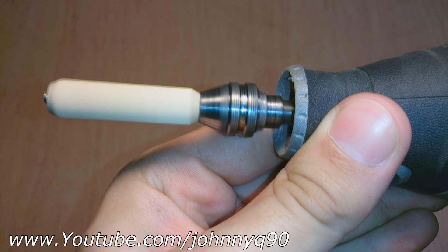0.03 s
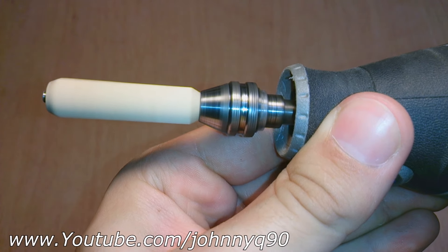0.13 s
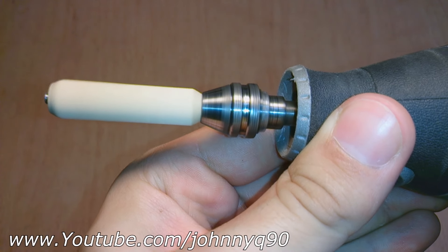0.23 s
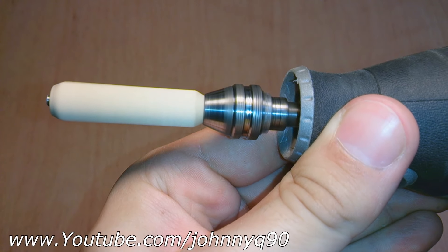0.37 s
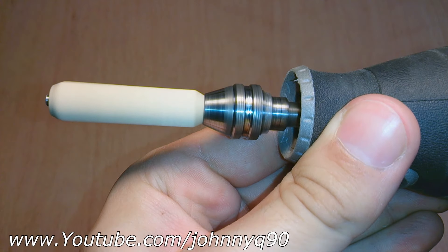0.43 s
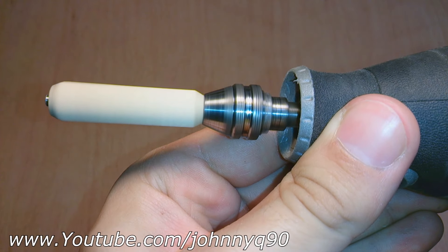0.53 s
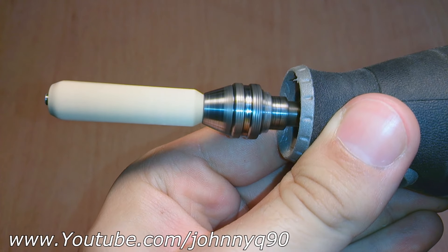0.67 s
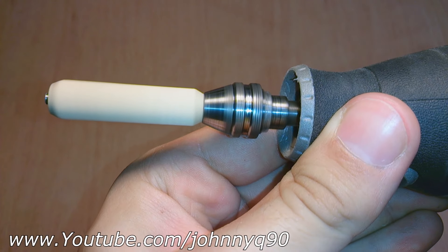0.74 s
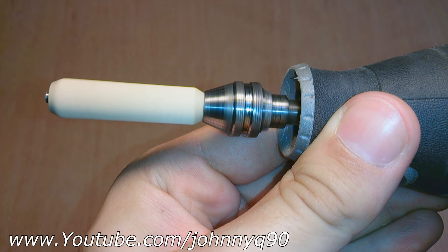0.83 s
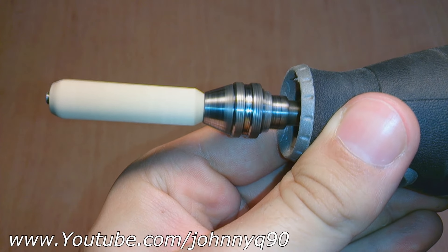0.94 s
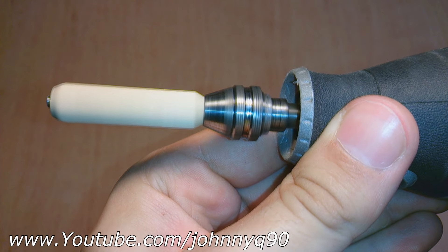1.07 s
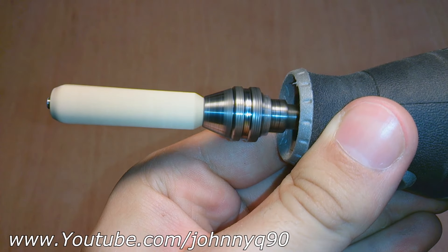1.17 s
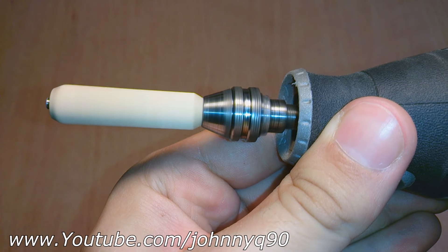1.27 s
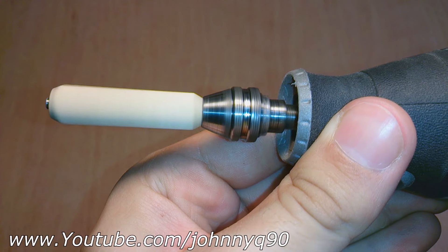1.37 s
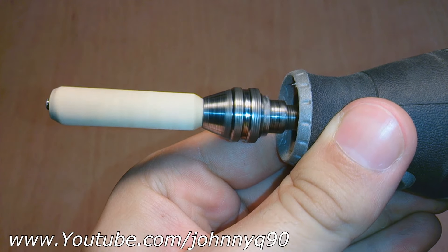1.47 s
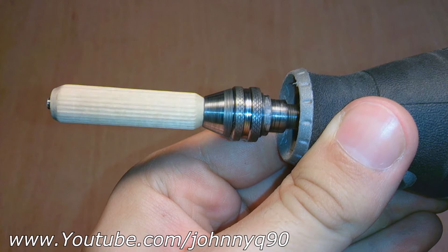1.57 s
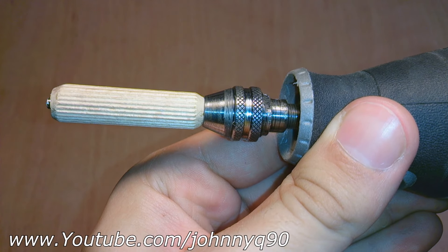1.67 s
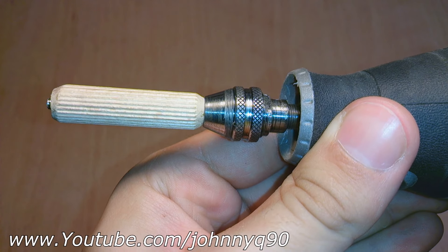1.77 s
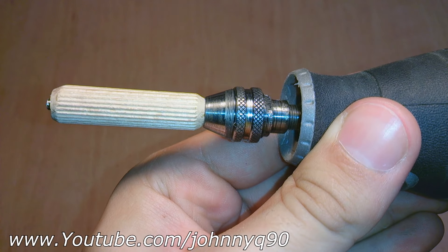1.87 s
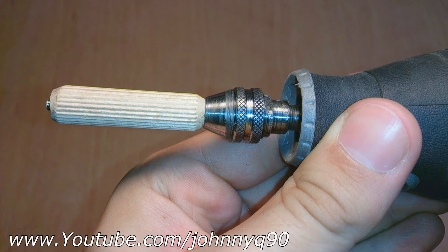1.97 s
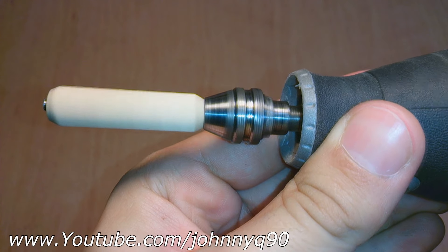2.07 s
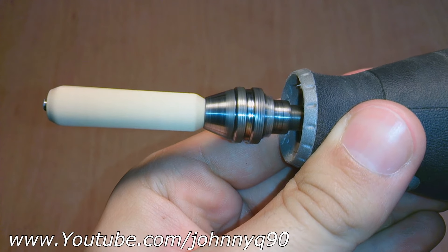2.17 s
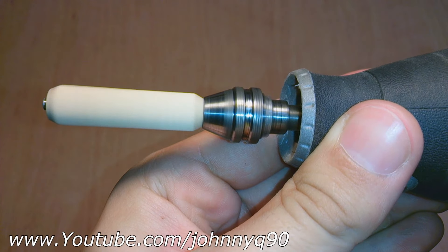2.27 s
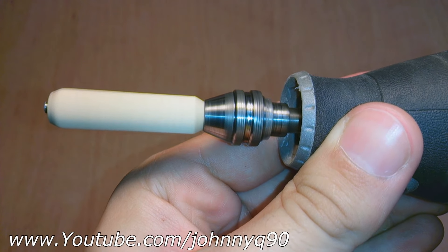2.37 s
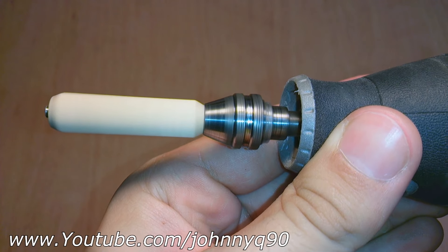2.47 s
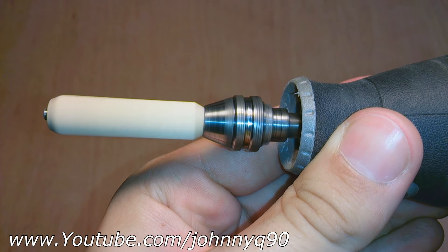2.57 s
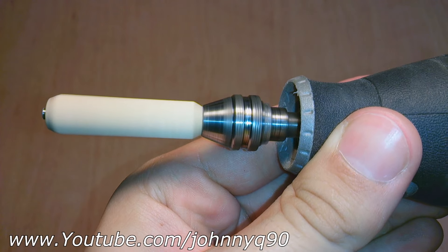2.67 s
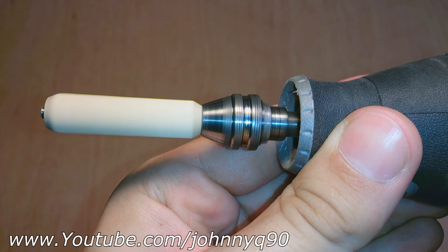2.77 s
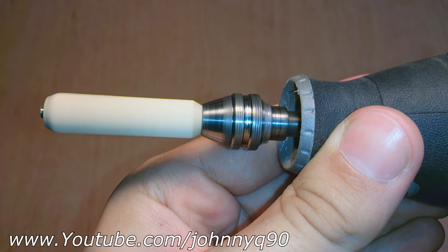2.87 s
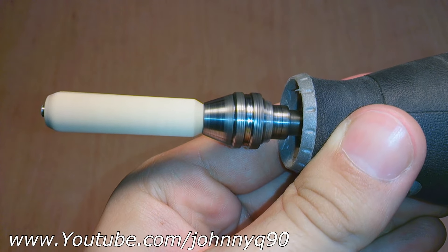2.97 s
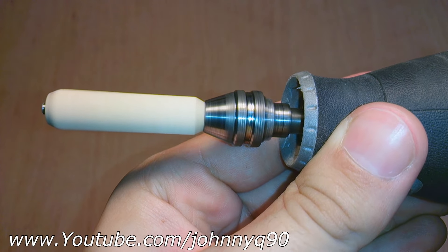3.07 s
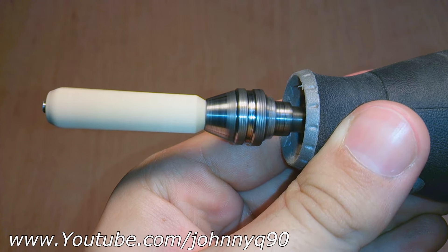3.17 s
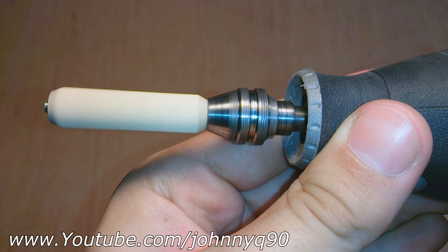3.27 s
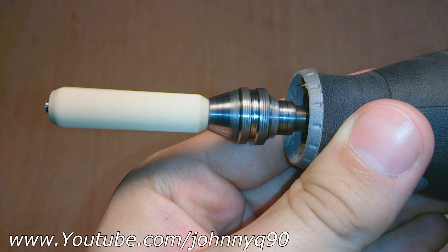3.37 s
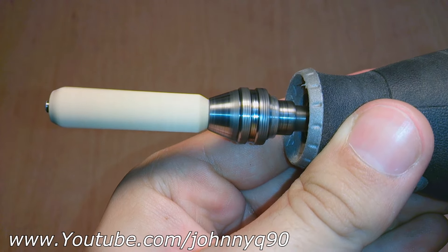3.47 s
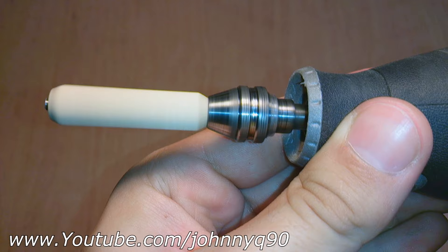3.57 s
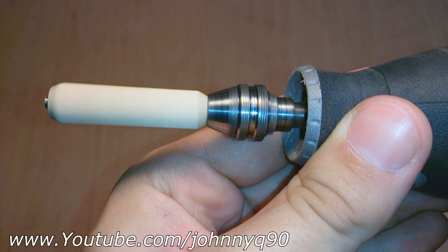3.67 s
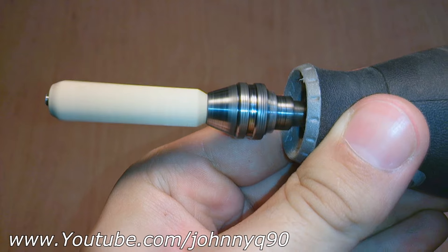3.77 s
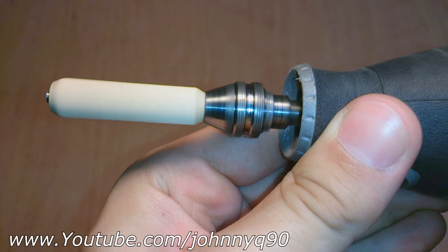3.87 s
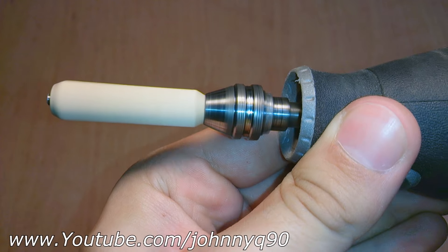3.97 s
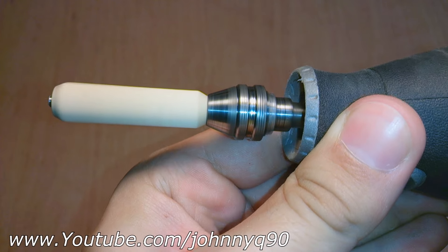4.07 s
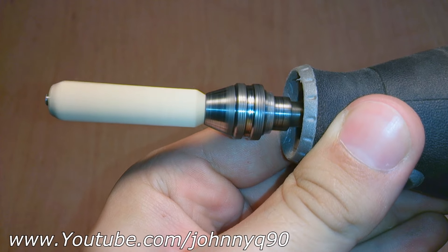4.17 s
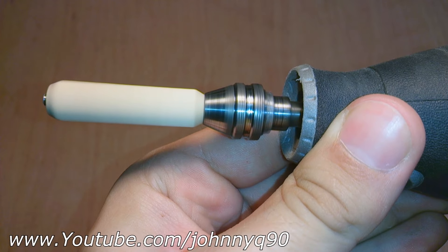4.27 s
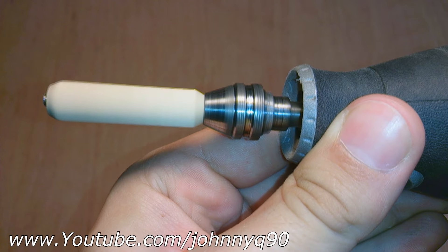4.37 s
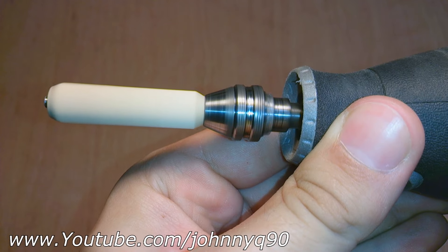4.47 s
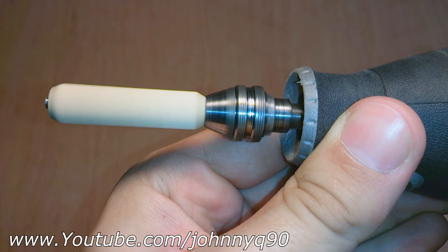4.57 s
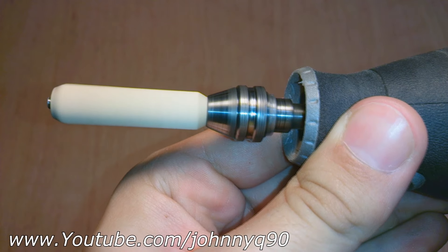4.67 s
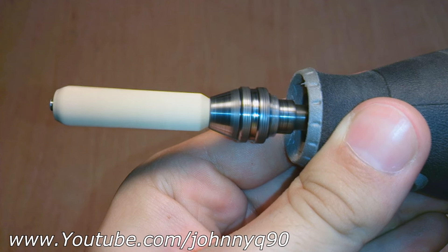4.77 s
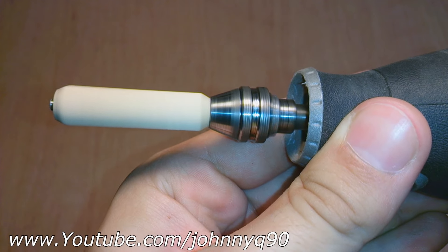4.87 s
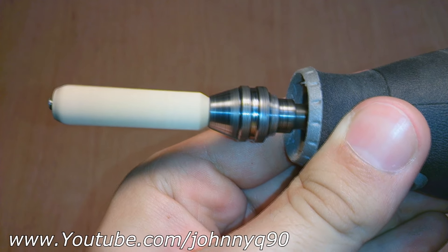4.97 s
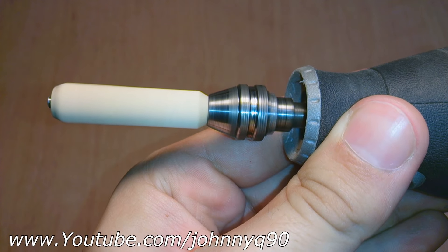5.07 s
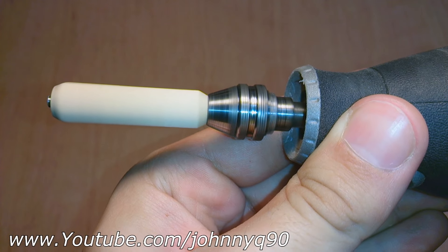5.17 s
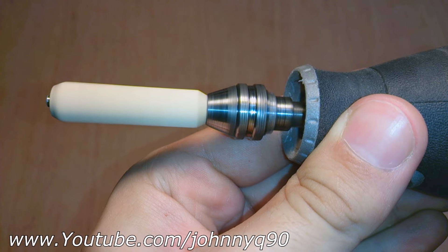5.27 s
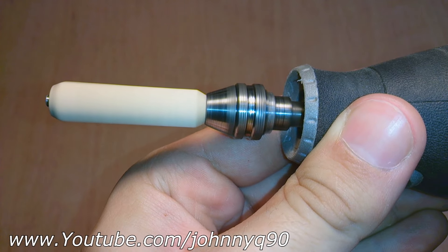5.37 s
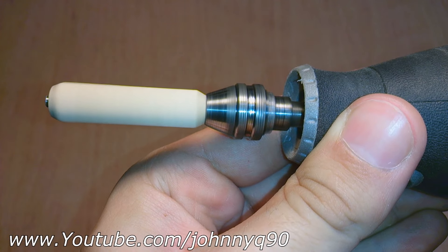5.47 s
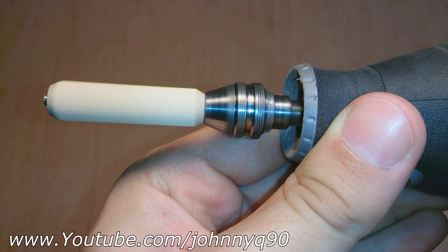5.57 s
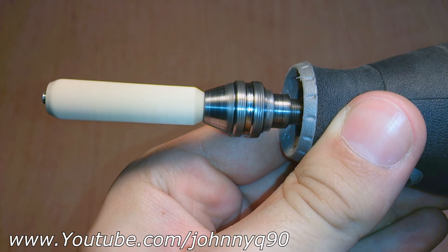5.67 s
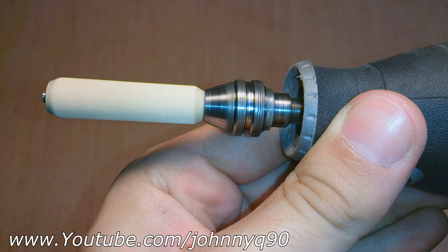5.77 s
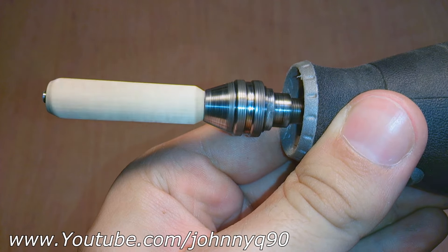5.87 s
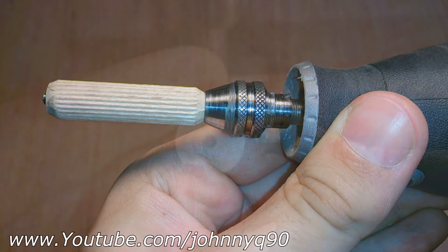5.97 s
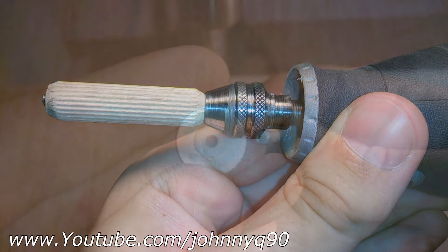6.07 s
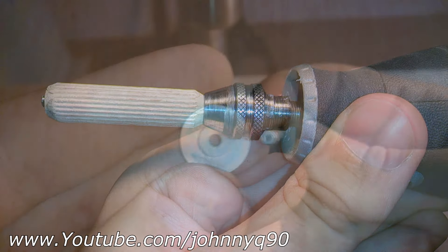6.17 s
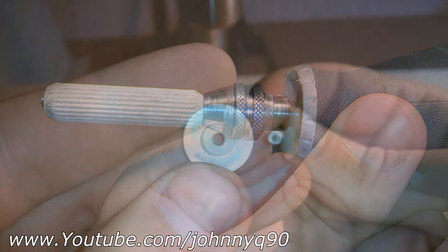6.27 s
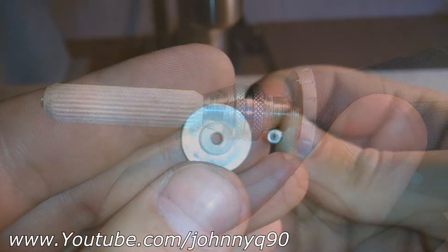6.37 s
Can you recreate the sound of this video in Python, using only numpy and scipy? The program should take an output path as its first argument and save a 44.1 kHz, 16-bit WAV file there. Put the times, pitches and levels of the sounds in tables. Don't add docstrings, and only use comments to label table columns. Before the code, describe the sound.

A handheld rotary tool, very close and almost entirely on the left, slides from a high whine down to a rattle and single brush ticks. After a short pause, a switch squeaks and snaps; the whistle surges up, steadies at a piercing pitch with hissing air and wind buffeting, then is switched off and coasts down through rattle and ticks, leaving faint finger taps in a quiet room.

```python
import sys
import numpy as np
from scipy import signal
from scipy.fft import rfft, irfft, next_fast_len
from scipy.io import wavfile
from scipy.ndimage import uniform_filter1d

SR = 44100
rng = np.random.default_rng(int(sys.argv[2]) if len(sys.argv) > 2 else 0)


def wrap_up_sound(samples):
    columns = np.atleast_2d(samples).T
    tamed = np.clip(columns, -1, 1)
    steps = np.round(tamed * 32767).astype(np.int16)
    wavfile.write(sys.argv[1], SR, steps)


def to_linear_factor(level_db):
    exponent = np.asarray(level_db, float) / 20
    return 10 ** exponent


N = 282681

BLADES, BARS, BALL_ORDER = 18, 8, 2.55
ON_S, OFF_S = 2.2504, 4.053
MAINS_HZ = 50.02
GAIN_DB = 6.0


def rms_one(x):
    return x / np.sqrt(np.mean(x ** 2) + 1e-20)


def response(hz, points, modes):
    at, db = np.transpose(points)
    gain = to_linear_factor(np.interp(np.log(hz), np.log(at), db))
    for mode_hz, width_hz, mode_db in modes:
        detuning = 2 * (hz - mode_hz) / width_hz
        gain = gain * (1 + (to_linear_factor(mode_db) - 1) / (1 + detuning ** 2))
    return gain


def colour(x, points, modes=()):
    size = next_fast_len(N + SR // 4)
    hz = np.maximum(np.fft.rfftfreq(size, 1 / SR), 1)
    inside = (hz >= points[0][0]) & (hz <= points[-1][0])
    return irfft(rfft(x, size) * response(hz, points, modes) * inside, size)[..., :N]


def drift(rate_hz):
    r = np.exp(-2 * np.pi * rate_hz / SR)
    slow = signal.lfilter([1], [1, -2 * r, r * r], rng.standard_normal(N + SR))[SR:]
    return rms_one(slow - slow.mean())


def noise_pair():
    left, own = rng.standard_normal((2, N))
    share = 0.15
    return np.array([left, share * left + np.sqrt(1 - share ** 2) * own])


def blade_rate(t):
    # start_s, blade_rate_hz, friction_hz, drag_time_s
    coasts = [
        (0, 7232, 9124, 3.112),
        (4.053, 8425, 8485, 3.012),
    ]
    first, second = [(hz + friction) * np.exp(-(t - s) / drag) - friction for s, hz, friction, drag in coasts]
    on = np.maximum(t - ON_S, 0)
    top_hz, quick_share, quick_s, slow_s = 8470, 0.4705, 0.1106, 0.3914
    shortfall = quick_share * np.exp(-on / quick_s) + (1 - quick_share) * np.exp(-on / slow_s)
    powered = top_hz * (1 - shortfall)
    return np.maximum(np.where(t < ON_S, first, np.where(t < OFF_S, powered, second)), 1)


def by_speed(blade_hz, db, db_per_oct, fade_hz, steepness=2):
    return to_linear_factor(db + db_per_oct * np.log2(blade_hz / 5000)) / (1 + (fade_hz / blade_hz) ** steepness)


def order(turns, shaft_hz, multiple, wander_db):
    audible = np.clip((17000 - multiple * shaft_hz) / 1000, 0, 1)
    return np.sqrt(2) * audible * to_linear_factor(wander_db) * np.sin(2 * np.pi * (multiple * turns + rng.random()))


def brushes(turns, shaft_hz, first, count):
    return sum(order(turns, shaft_hz, BARS * k, 2.2 * drift(12)) for k in range(first, first + count))


def mains_buzz(t):
    # band_hz, width_hz, level_db
    bands = [(11170, 490, -93.5), (12750, 620, -101), (14800, 900, -99)]
    hz = MAINS_HZ * np.arange(200, 310)
    gain = sum(to_linear_factor(db) / (1 + (2 * (hz - at_hz) / width_hz) ** 4) for at_hz, width_hz, db in bands)
    gain = gain * to_linear_factor(5.5 * rng.standard_normal(len(hz)))
    phases = rng.random(len(hz))
    return sum(np.sqrt(2) * g * np.sin(2 * np.pi * (f * t + p)) for f, g, p in zip(hz, gain, phases))


def background():
    # frequency_hz, density_db
    floor = [(12, -23.5), (20, 3), (32, -0.5), (53, -10.5), (80, -14), (130, -2.5), (175, -24.5),
             (353, -23), (911, -31), (1700, -34), (2600, -33), (8010, -35.5), (10300, -24), (12000, -29),
             (15700, -34)]
    t = np.arange(N) / SR
    noise = colour(rng.standard_normal((2, N)), floor)
    noise /= np.std(noise)
    rumble = signal.sosfilt(signal.butter(2, 400, fs=SR, output="sos"), noise)
    busier = np.clip((t - 5.6) / 0.48, 0, 1)
    room = to_linear_factor(8.0 * busier) * rumble + to_linear_factor(3.5 * busier) * (noise - rumble)
    left = to_linear_factor(GAIN_DB) * (to_linear_factor(-73.5) * room[0] + mains_buzz(t))
    return np.array([left, to_linear_factor(-80) * room[1]])


def squeak(s, length_s, hz, width_hz):
    band = signal.butter(2, [hz - width_hz / 2, hz + width_hz / 2], "band", fs=SR, output="sos")
    swell = np.exp(-(2 * (np.arange(N) / SR - s) / length_s) ** 4)
    return swell, rms_one(signal.sosfilt(band, rng.standard_normal(N)))


def rubs():
    # centre_s, length_s, pitch_hz, width_hz, level_db
    slips = [
        (2.132, .03, 4220, 2980, -78),
        (2.252, 0.03, 5184, 5350, -50),
        (2.277, 0.043, 330, 120, -71),
        (4.379, 0.014, 450, 518, -22.5),
        (6.149, 0.0039, 2600, 3590, -66.5),
        (6.376, 0.036, 1700, 1626, -72.5),
    ]
    total = np.zeros(N)
    for *slip, db in slips:
        swell, rough = squeak(*slip)
        total += to_linear_factor(db) * swell * rough
    return total


def ticks(rows, hz, t60_s):
    out, t = np.zeros(N + 4000), np.arange(4000) / SR
    band = signal.butter(3, [hz * 0.87, min(hz * 1.13, .45 * SR)], "band", fs=SR, output="sos")
    envelope = to_linear_factor(-60 * t / t60_s) * (1 - np.exp(-t / 0.0006))
    for (s, db), noise in zip(rows, rng.standard_normal((len(rows), 4000))):
        burst = signal.sosfilt(band, noise * envelope)
        at = round(s * SR)
        out[at:at + 4000] += to_linear_factor(db) * burst / np.abs(burst).max()
    return out[:N]


def contacts():
    # start_s, peak_db
    brush_ticks = [(1.616, -52), (1.6534, -48), (1.7035, -46), (1.7475, -44.5), (1.7818, -48.5),
                   (2.1394, -66), (2.234, -49), (2.2403, -38), (2.245, -32.5), (2.2557, -26.5),
                   (2.2612, -48), (5.9624, -53), (5.9675, -43), (5.973, -47), (6.004, -45), (6.0115, -47),
                   (6.0204, -47), (6.0284, -47), (6.0628, -54)]
    # start_s, peak_db
    taps = [
        (6.1474, -61),
        (6.3735, -54),
        (6.3794, -56),
    ]
    return ticks(brush_ticks, hz=10700, t60_s=0.015) + ticks(taps, hz=4100, t60_s=0.0078)


def draught(shaft_hz):
    # frequency_hz, density_db
    spectrum = [(12, -50), (20, 0.5), (54, -0.5), (199, 3.5), (394, -9), (565, -19), (637, -22),
                (1050, -32.5), (1200, -48), (1560, -47), (2640, -120)]
    air = rms_one(colour(rng.standard_normal(N), spectrum))
    roll = signal.sosfilt(signal.butter(4, 95, fs=SR, output="sos"), air)
    above = signal.sosfilt(signal.butter(4, 95, "high", fs=SR, output="sos"), air)
    calm = np.clip(1 - shaft_hz / 330, 0, 1)
    puffs_db = (1 + 6 * calm) * drift(15)
    lumps = to_linear_factor(puffs_db + 4.5 * drift(92) - 63 * calm ** 2.41)
    crests = signal.sosfilt(signal.butter(2, 450, "high", fs=SR, output="sos"), air) * (shaft_hz / 470) ** 2
    roll = roll * to_linear_factor(0.5 * puffs_db)
    return roll + (above + to_linear_factor(12.5) * crests) * lumps * to_linear_factor(-7.5)


def casing(turns, shaft_hz):
    # frequency_hz, density_db
    broad = [(290, -13), (500, -13.5), (752, -14), (1160, -2.5), (1670, -7.5), (3160, -4), (3610, -8),
             (5200, -6.5), (7000, -10), (9100, -52), (15400, -120)]
    # mode_hz, width_hz, gain_db
    modes = [(1260, 310, 1), (1824, 230, 5.5), (3443, 210, 10.5), (4378, 300, 20), (5150, 200, -19),
             (5900, 400, 8.5)]
    # mode_hz, width_hz, gain_db
    housing = [(5000, 900, 8)]
    # ball_rate_multiple, level_db
    ball_tones = [(1, -24), (3, -17), (3.85, -27), (4.4, -25), (5, -16)]
    grit = noise_pair() * to_linear_factor(1.0 * drift(36) + 2.0 * drift(300))
    slow = np.clip(1 - shaft_hz / 480, 0, 1) ** 0.49
    balls = sum(to_linear_factor(db + 1.8 * drift(20)) * order(turns, shaft_hz, BALL_ORDER * k, 0) for k, db in ball_tones)
    bars = to_linear_factor(-31 + 11 * slow) * brushes(turns, shaft_hz, first=2, count=4)

    acceleration = uniform_filter1d(np.gradient(shaft_hz) * SR, size=3000)
    load = np.clip(acceleration / 1300, 0, 1) * np.clip((shaft_hz - 170) / 90, 0, 1)
    mains = 1 + 0.9 * np.sin(2 * np.pi * 100 * np.arange(N) / SR)
    pull = to_linear_factor(-6.5) * order(turns, shaft_hz, BARS, 0)
    pull += to_linear_factor(-7.0) * order(turns, shaft_hz, 2 * BARS, 0)
    pull += to_linear_factor(-9) * order(turns, shaft_hz, 6 * BALL_ORDER, 0)
    pull *= load * mains * to_linear_factor(2.6 * drift(40))

    tones = colour(to_linear_factor(-14 * slow ** 2 + 7.1 * load) * balls + bars, broad, modes)
    tones += colour(pull, broad, housing)
    plain = colour(grit, broad)
    noise = (1 - slow) * plain + slow * to_linear_factor(-9.5) * colour(grit, broad, modes)
    return (noise + to_linear_factor(-4) * tones) / np.std(plain[0])


def fan_hiss(turns, shaft_hz):
    # frequency_hz, density_db
    spectrum = [(2940, -21.5), (5000, -17.5), (6380, -15), (6850, -10.5), (9160, -5.5), (9470, -3.5),
                (10000, -0.5), (10900, -3.5), (12200, -11), (13200, -13), (15600, -14.5)]
    # mode_hz, width_hz, gain_db
    vents = [(6900, 800, 8), (8300, 600, 5), (10400, 1000, 5), (12700, 900, 8)]
    air = colour(noise_pair() * to_linear_factor(0.32 * drift(4.8) + 1.2 * drift(330)), spectrum)
    slow = np.clip(1 - shaft_hz / 470, 0, 1)
    uneven = sum(order(turns, shaft_hz, BARS * k + 4, 0) + order(turns, shaft_hz, BARS * k + 6, 0)
                 for k in range(4, 16))
    comb = brushes(turns, shaft_hz, first=2, count=14) + to_linear_factor(-6) * uneven
    comb = to_linear_factor(-31 + 26 * slow * (1.3 - slow)) * comb
    return (air + colour(comb, spectrum, vents)) / np.std(air[0])


def blade_tone(turns, shaft_hz):
    # shaft_multiple, level_db
    shaft_tones = [(15, -45), (23, -29.5), (36, -20)]
    others = sum(to_linear_factor(db) * order(turns, shaft_hz, k, 2.1 * drift(10)) for k, db in shaft_tones)
    waver_db = 5 * np.clip(1 - shaft_hz / 470, 0, 0.5) * drift(22)
    return order(turns, shaft_hz, BLADES, 0.53 * drift(60) + waver_db) + others


def jolted(tone):
    # centre_s, length_s, pitch_hz, width_hz, level_db (re whistle)
    jolts = [
        (0.125, 0.035, 6550, 500, 3),
        (4.061, 0.026, 8700, 550, 0),
    ]
    for *row, db in jolts:
        swell, rough = squeak(*row)
        tone = (1 - 0.6 * swell) * tone + to_linear_factor(db) * swell * rough
    return tone


def fan_whistle(t, turns, blade_hz, rattle):
    # frequency_hz, level_db
    strength = [(600, -127), (1000, -87), (1800, -77.5), (2500, -58.5), (4500, -41), (7000, -24.5),
                (7800, -14.5), (8500, -5)]
    # mode_hz, width_hz, gain_db
    path = [(1170, 250, 6), (3350, 300, 4), (5920, 260, -15), (6280, 200, -11), (6850, 250, 4),
            (7150, 200, -5)]
    unpowered = (t < ON_S) | (t > OFF_S)
    carried = to_linear_factor(-12) * rattle / (1 + ((blade_hz - 1150) / 380) ** 4) * unpowered
    gain = np.maximum(response(blade_hz, strength, path), carried) * (blade_hz > 300)
    whistle = gain * jolted(blade_tone(turns, blade_hz / BLADES))
    strain = np.clip(np.gradient(blade_hz) * SR / 25000, 0, 1)
    return whistle * to_linear_factor(-7 * strain) * (1 + strain * np.sin(4 * np.pi * MAINS_HZ * t))


def scene():
    # time_s, level_db
    aim = [(0, 3), (1.0, -3), (1.42, 4), (2.4, -6), (3.0, -2), (3.9, 0), (4.3, 4), (4.8, -3.5), (5.5, -6.5)]
    # frequency_hz, level_db
    shield = [(60, 58), (200, 56.5), (380, 21.5), (700, 12.5), (1290, 16), (2380, 23), (4400, 34.5),
              (7000, 37), (10000, 103), (13000, 47.5), (15500, 36)]
    t = np.arange(N) / SR
    blade_hz = blade_rate(t)
    shaft_hz = blade_hz / BLADES
    turns = np.cumsum(shaft_hz) / SR

    air = by_speed(blade_hz, db=-29, db_per_oct=22, fade_hz=0.46)
    brush = by_speed(blade_hz, db=-40.5, db_per_oct=5.5, fade_hz=230)
    bearing = by_speed(blade_hz, db=-41, db_per_oct=14.5, fade_hz=1)
    grind = by_speed(blade_hz, db=-44.5, db_per_oct=5.5, fade_hz=450)
    rattle = bearing + grind
    arriving_hz = np.minimum(blade_hz, blade_rate(t - 0.097))
    stream = by_speed(arriving_hz, db=-27.5, db_per_oct=8, fade_hz=1880, steepness=6)

    whistle = fan_whistle(t, turns, blade_hz, rattle)
    tool = (air + brush) * fan_hiss(turns, shaft_hz) + to_linear_factor(-1.0) * rattle * casing(turns, shaft_hz) + whistle
    tool += contacts()
    left = tool[0] + rubs() + to_linear_factor(np.interp(t, *np.transpose(aim))) * stream * draught(shaft_hz)
    hum = to_linear_factor(-37) * rattle * order(turns, shaft_hz, 1, 0)
    right = colour(tool[1], [(hz, -db) for hz, db in shield]) + hum + to_linear_factor(-41.5) * whistle
    return to_linear_factor(GAIN_DB) * np.array([left, right]) + background()


def band_limit(x):
    return signal.sosfilt(signal.butter(12, 15780, fs=SR, output="sos"), x)


def record(dry):
    level_db = 10 * np.log10(uniform_filter1d(dry[0] ** 2, size=int(0.063 * SR)) + 1e-12)
    excess_db = np.maximum(level_db + 18, 0)
    held = dry * to_linear_factor(-0.89 * excess_db)
    ceiling = 0.3
    limited = ceiling * np.tanh(held / ceiling)
    cut = signal.sosfilt(signal.cheby2(12, 60, 16250, fs=SR, output="sos"), limited)
    return band_limit(cut)


dry = scene()
out = record(dry)
wrap_up_sound(out)
```